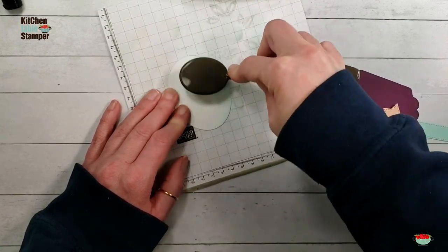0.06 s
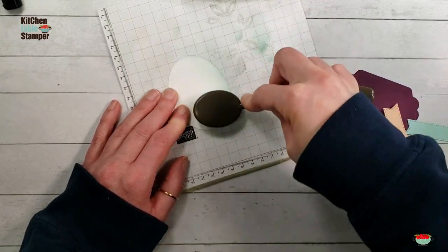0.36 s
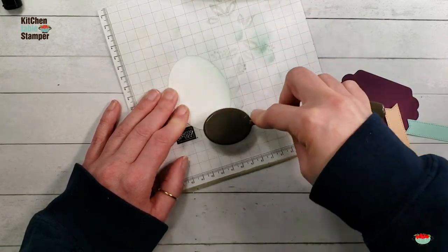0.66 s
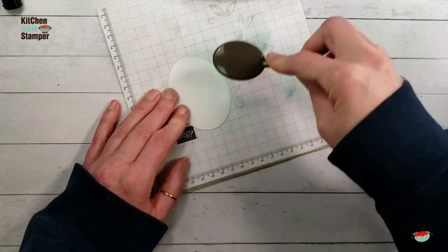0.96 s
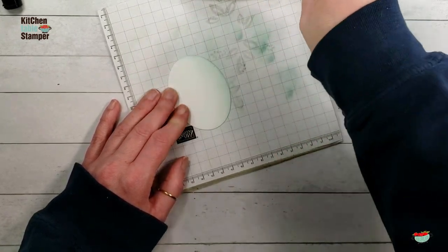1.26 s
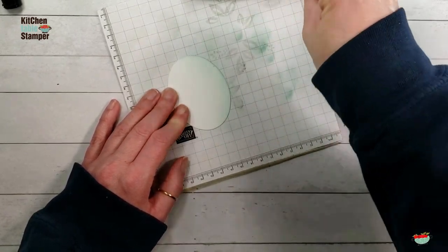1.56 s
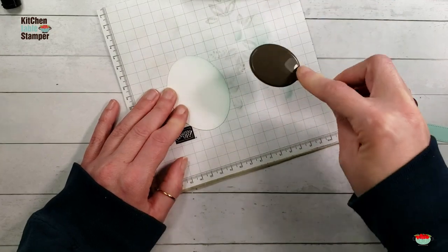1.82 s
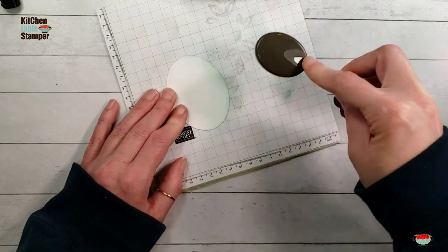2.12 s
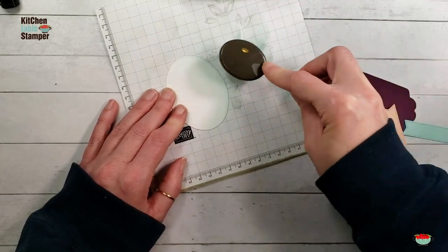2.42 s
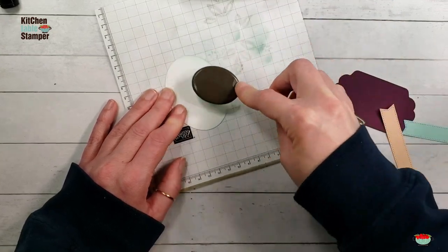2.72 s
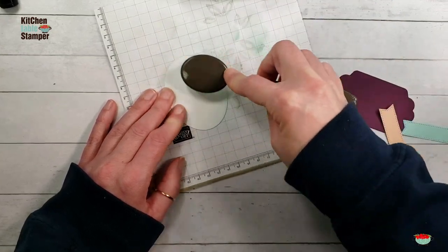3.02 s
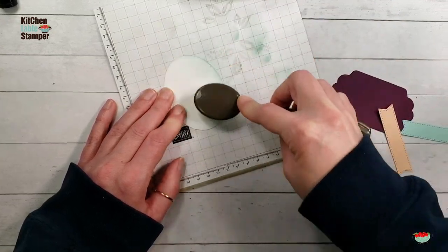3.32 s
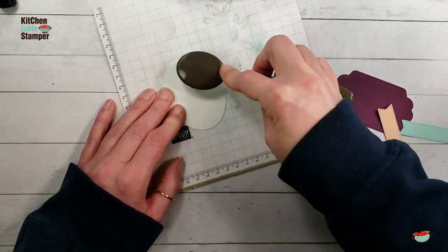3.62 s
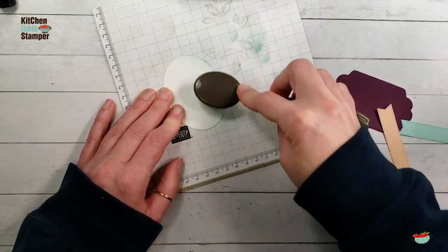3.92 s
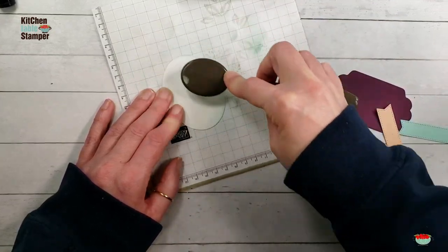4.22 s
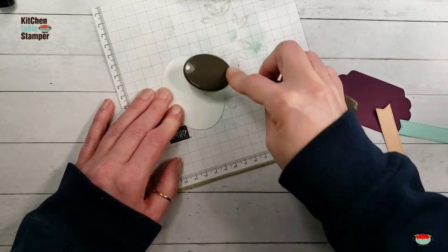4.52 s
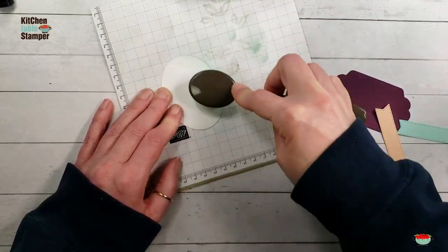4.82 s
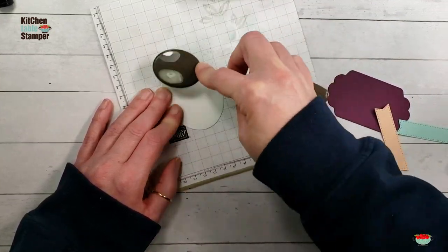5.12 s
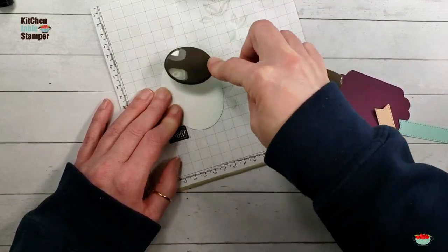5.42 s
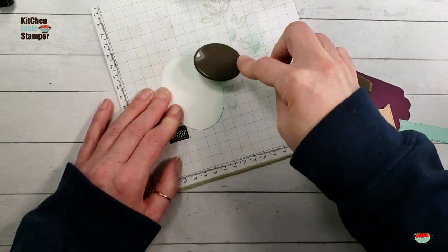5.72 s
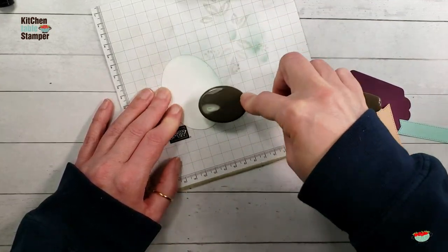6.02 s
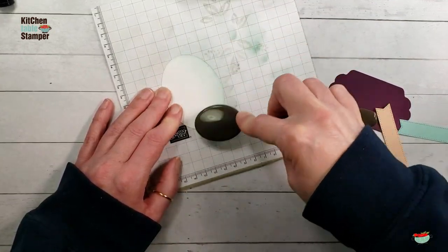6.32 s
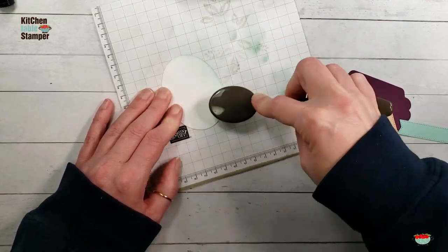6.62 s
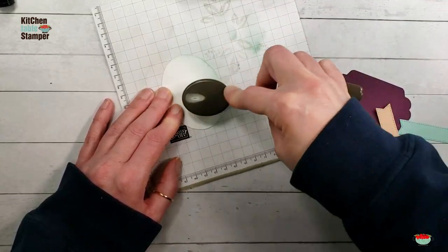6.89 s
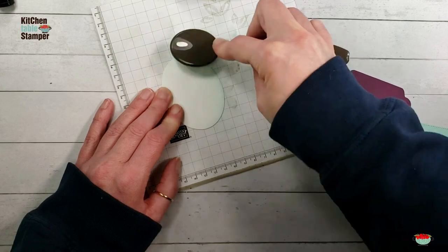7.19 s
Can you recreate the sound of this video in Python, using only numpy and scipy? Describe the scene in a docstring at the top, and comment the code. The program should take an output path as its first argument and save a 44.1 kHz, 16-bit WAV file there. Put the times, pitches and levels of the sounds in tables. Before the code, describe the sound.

A soft brush hisses back and forth over card, quickening into scrubbing, with three early knocks on a table and a low room hum.

```python
"""A soft brush hisses to and fro over card on a table, in strokes that grow shorter and quicker.
Its bristles slip on the paper, and the sheet murmurs under the slow, heavy strokes. Early on the brush
lifts and a sleeve rustles faintly: three knocks set the table ringing, and around the second something
ridged slides with a fine zip. Then the brush head lands with soft thumps as the sweeps return and
tighten into scrubbing. Underneath, a small room rumbles and an appliance hums."""
import sys
import numpy as np
from scipy import signal
from scipy.fft import rfft, irfft, next_fast_len
from scipy.io import wavfile
from scipy.ndimage import uniform_filter1d

SR = 44100
rng = np.random.default_rng(int(sys.argv[2]) if len(sys.argv) > 2 else 0)


def wav_record(signal):
    """Record a signal, one row per channel, as 16-bit PCM in the file named by sys.argv[1]."""
    frames = np.transpose(np.atleast_2d(signal))
    bounded = np.clip(frames, -1, 1)
    # unit amplitude maps onto the largest positive 16-bit level
    quanta = np.round(bounded * 32767).astype(np.int16)
    wavfile.write(sys.argv[1], SR, quanta)


N = 324267
T = np.arange(N) / SR


def from_db(db):
    """Decibels to gain."""
    return 10 ** (np.asarray(db) / 20)


def rms_one(x):
    """Scale to unit rms."""
    return x / np.sqrt(np.mean(x ** 2) + 1e-20)


def automation(points):
    """Draw a (time, value) curve through every sample."""
    return np.interp(T, *np.transpose(points))


def at_hz(points, hz):
    """Read a table on a log-frequency axis."""
    f, value = np.transpose(points)
    return np.interp(np.log(hz + 1e-3), np.log(f), value)


def equalise(x, spectrum):
    """Shape x with an EQ curve that rolls off below its first point."""
    size = next_fast_len(len(x))
    hz = np.arange(size // 2 + 1) * SR / size
    low_cut = 1 - np.exp(-(hz / spectrum[0][0]) ** 2 * 2)
    return irfft(rfft(x, size) * from_db(at_hz(spectrum, hz)) * low_cut, size)[:len(x)]


def band(x, low_hz, high_hz, order=2):
    """Butterworth band-pass."""
    return signal.sosfilt(signal.butter(order, [low_hz, high_hz], "band", fs=SR, output="sos"), x)


def resonant_noise(hz, width):
    """One steady band of noise at unit rms, its lower edge no lower than 10 Hz."""
    noise = rng.standard_normal(N + SR)
    return rms_one(band(noise, max(hz - width / 2, 10), hz + width / 2)[SR:])


def ring(force, hz, t60):
    """One mode: a unit click starts a decaying sine of height 1."""
    r, w = from_db(-60 / (t60 * SR)), 2 * np.pi * hz / SR
    return signal.lfilter([0, np.sin(w)], [1, -2 * r * np.cos(w), r * r], force + 1e-18)


def add(out, s, sound):
    """Mix a sound in at time s."""
    i = int(s * SR)
    out[i:i + len(sound)] += sound[:N - i]


def friction(spread_db):
    """Countless tiny slips of uneven size."""
    return rng.standard_normal(N) * from_db(spread_db * rng.standard_normal(N))


# EQ of the room air: (frequency [Hz], gain [dB])
AIR_EQ = [(12, 6), (30, 0.5), (45, -19), (60, -7.5), (80, -16.5), (130, -18), (190, -29), (330, -29),
          (450, -33), (900, -38), (2000, -46), (4000, -53.5), (9000, -60.5), (16000, -65)]
# partials of the appliance hum: (frequency [Hz], level [dB])
HUM_PARTIALS = [(59.6, -52), (119.2, -49.5), (238.4, -67)]
def room_tone(air_mids_db=-61.5, waver=.24, fan_hz=540, fan_db=-63):
    """The bed: rumbling air, an appliance's slightly wavering hum and the soft note of its fan."""
    air = equalise(rng.standard_normal(N), AIR_EQ)
    air = air / np.std(band(air, 700, 3000, order=4))
    hum = 0
    for hz, db in HUM_PARTIALS:
        tone = np.sqrt(2) * np.sin(2 * np.pi * hz * T)
        hum = hum + from_db(db) * (tone + waver * resonant_noise(hz, width=11.3))
    fan = resonant_noise(fan_hz, width=28)
    return from_db(air_mids_db) * air + hum + from_db(fan_db) * fan


# tone of the reverb: (frequency [Hz], gain [dB])
REVERB_EQ = [(60, 0.5), (150, -0.5), (300, 0.5), (700, -4), (2000, 4.5), (5000, 1), (10000, -3),
             (16000, 5.5)]
# decay of the reverb: (frequency [Hz], t60 [s])
REVERB_DECAY = [(100, 0.28), (400, 0.43), (1000, 0.55), (3000, 0.33), (8000, 0.27), (16000, 0.33)]
def room_reverb(x, wet_db=-9, predelay_s=.0062):
    """The small room's diffuse tail dies away band by band."""
    t, edges = np.arange(SR * 3 // 4) / SR, np.geomspace(50, 18000, 13)
    tail = 0
    for low, high in zip(edges, edges[1:]):
        hz = np.sqrt(low * high)
        decay = from_db(at_hz(REVERB_EQ, hz) - 60 * t / at_hz(REVERB_DECAY, hz))
        tail = tail + band(rng.standard_normal(len(t)), low, high) * decay
    tail = tail * (t > predelay_s)
    return from_db(wet_db) * signal.fftconvolve(x, tail / np.sqrt(np.sum(tail ** 2)))[:N]


def wall_echo(x, echo_db=-19, echo_s=.043, dull_hz=700):
    """One dull slap back from the far wall."""
    return from_db(echo_db) * band(np.interp(T - echo_s, T, x), 160, dull_hz, order=1)


# EQ of the slide's rasp: (frequency [Hz], gain [dB])
RASP_EQ = [(400, -16), (1000, 14), (2300, 2), (3500, 4), (4900, 8), (6000, 0.5), (8000, 0), (10000, -12),
           (16000, -14)]
def slide(start_s=1.194, end_s=1.596, peak_db=-50, zip_db=-17, top_ridges_hz=9700):
    """A finely ridged surface rasps with a thin zip; pitch and level follow one arch of speed."""
    arch = np.abs(np.sin(np.pi * np.clip((T - start_s) / (end_s - start_s), 0, 1)))
    jitter = 1 + .022 * resonant_noise(300, width=560)
    ridges_hz = top_ridges_hz * arch ** .4 * jitter
    whistle = np.sin(2 * np.pi * np.cumsum(ridges_hz) / SR)
    rasp = rms_one(equalise(friction(spread_db=3), RASP_EQ))
    return from_db(peak_db) * arch ** 1.4 * (rasp + from_db(zip_db) * whistle)


# modes of the table top: (frequency [Hz], level [dB], t60 [s])
TABLE_MODES = [(118, 5.5, .105), (160, -14, .1), (225, -11, .1), (252, -9.5, .11), (305, -12.5, .1),
               (375, -12, .07), (430, -9, .1), (490, -13, .08), (545, -6, .065), (679, -6.5, .06),
               (800, -13, .045), (1000, -16, .05), (1205, -22, .05), (1500, -25, .04)]
def table_top(t, hollow_db, hollow_hz=265, width_octaves=.71):
    """The table rings from one blow; a hollow-sounding blow favours the low mids."""
    click, out = 1.0 * (t == 0), 0
    for hz, db, t60 in TABLE_MODES:
        nearness = np.exp(-(np.log2(hz / hollow_hz) / width_octaves) ** 2)
        out = out - from_db(db + hollow_db * (nearness - .5)) * ring(click, hz, t60)
    return out


# EQ of a hard contact's crack: (frequency [Hz], gain [dB])
CRACK_EQ = [(400, 1), (900, 0.5), (1400, -2.5), (1900, -5.5), (2400, -9.5), (3100, -15.5), (3800, -14),
            (6500, -22), (10000, -33), (16000, -41)]
# knocks on the table; crack and snap are relative to strength: (time [s], strength [dB],
# hollowness [dB], push [0-1], crack [dB], crack centre [Hz], snap [dB])
KNOCK_CUES = [(1.1798, -11.3, 1, .45, -4.5, 2800, -20), (1.3586, -9.2, -2, .54, -2, 3000, -20),
              (1.9792, -9.7, 16, .25, -1, 1400, -15)]
def knocks(push_s=.00495, body_hz=1400, crack_trim_db=-5, rise_s=.0004, crack_t60=.032, snap_t60=.015):
    """A short push, then the hard contact that snaps, cracks and sets the table ringing."""
    body, attacks, t = np.zeros(N), np.zeros(N), np.arange(SR // 2) / SR
    crack_envelope = (1 - np.exp(-t / rise_s)) * from_db(-60 * t / crack_t60)
    for s, db, hollow_db, push, crack_db, centre_hz, snap_db in KNOCK_CUES:
        add(body, s - push_s, push * np.linspace(0, 1, int(push_s * SR)) ** 2)
        add(body, s, from_db(db) * table_top(t, hollow_db))
        crack = equalise(rng.standard_normal(len(t)), CRACK_EQ)
        crack = rms_one(crack + band(crack, centre_hz / 1.32, centre_hz * 1.08, order=1))
        add(attacks, s - rise_s, from_db(db + crack_db + crack_trim_db) * crack_envelope * crack)
        snap = from_db(db + snap_db - 60 * t / snap_t60) * rng.standard_normal(len(t))
        add(attacks, s, band(snap, 2600, 8500))
    # the heavy top cannot follow the fastest part of the blow
    return attacks + signal.sosfilt(signal.butter(2, body_hz, fs=SR, output="sos"), body)


# the brush head touches down: (time [s], strength [dB], tick relative to strength [dB])
LANDING_CUES = [(2.49, -42.5, -26), (3.859, -34, -13), (4.948, -29.5, -14), (5.54, -30.5, -22),
                (5.745, -37.5, -30), (6.113, -37.5, -30), (6.282, -34.5, -30), (6.469, -39.5, -28),
                (6.753, -40, -32)]
def landings(soft_hz=440, tick_t60=.04):
    """The padded head gives a dull thump, a little different each time, and a faint tick of bristles."""
    thumps, ticks, t = np.zeros(N), np.zeros(N), np.arange(SR // 3) / SR
    for s, db, tick_db in LANDING_CUES:
        add(thumps, s, from_db(db) * table_top(t, hollow_db=rng.normal(5, 4.3)))
        add(ticks, s, from_db(db + tick_db - 60 * t / tick_t60) * rng.standard_normal(len(t)))
    return band(thumps, 80, soft_hz) + band(ticks, 1200, 5500)


# resonances of the card: (frequency [Hz], width [Hz], relative level [dB])
SHEET_RESONANCES = [(285, 139, 3), (610, 450, -12.5), (899, 184, -1), (1600, 850, -12.5)]
# fader of its murmur: (time [s], level [dB])
SHEET_FADER = [(0, -57), (.8, -63), (2.5, -61.5), (2.9, -56), (3.3, -56), (4.5, -67), (5.5, -61.5),
               (7.35, -86)]
def sheet_murmur(motion):
    """The card resonates under the moving brush, most in the slow, heavy strokes."""
    murmur = sum(from_db(db) * np.sqrt(width) * resonant_noise(hz, width)
                 for hz, width, db in SHEET_RESONANCES)
    return from_db(automation(SHEET_FADER)) * motion * rms_one(murmur)


# scrubbing cycles: (start [s], pace of the return as treble lift [dB])
SCRUB_CYCLES = [(5.30, .5), (5.525, 1), (5.73, 2), (5.92, 1.2), (6.10, -.5), (6.273, 3.2), (6.455, 2.3),
                (6.642, 2.5), (6.826, 3), (6.998, 1.7), (7.172, 3)]
# round loops flatten into straight strokes: (time [s], pause before push [s], pause before return [s])
TURN_PAUSES = [(5.3, .018, 0.0046), (5.6, .028, 0), (6.05, .028, .002), (6.5, 0.03, .03), (6.8, .016, .02),
               (7.3, 0.007, .018)]
def scrub_strokes(end_s=7.36, push_share=.52, push_pace_db=-1.6):
    """Each cycle of the hand is a push and a faster return; gives (start, end, pace) for each stroke."""
    s, before_push, before_return = np.transpose(TURN_PAUSES)
    ends = [start for start, _ in SCRUB_CYCLES[1:]] + [end_s]
    strokes = []
    for (start, return_pace_db), end in zip(SCRUB_CYCLES, ends):
        turn = start + push_share * (end - start)
        start_gap, end_gap = np.interp([start, end], s, before_push) / 2
        turn_gap = np.interp(turn, s, before_return) / 2
        strokes.append((start + start_gap, turn - turn_gap, push_pace_db))
        strokes.append((turn + turn_gap, end - end_gap, return_pace_db))
    return strokes


def stroke_envelopes(strokes, fade_s, arch_db, pace_arch_db, slowing_db):
    """Gains of the hiss and its treble: a stroke fades in, is fastest near its middle and fades out."""
    gains = np.zeros((2, N))
    for start, end, pace_db in strokes:
        fade = np.clip(np.minimum(T - start, end - T) / fade_s + .5, 0, 1)
        on = fade > 0
        from_middle = (T[on] - start) / (end - start) - .5
        arch = np.cos(np.pi * from_middle) - 2 / np.pi
        motion = fade[on] * from_db(arch_db * arch)
        treble = motion * from_db(pace_db + pace_arch_db * arch - slowing_db * from_middle)
        gains[:, on] += [motion, treble]
    return gains


# sweeps of the brush, and a faint, dull sleeve rustle near 0.9 s:
# (start [s], end [s], pace as treble lift [dB])
SWISH_CUES = [(0.01, 0.213, -3.5), (0.26, 0.47, -4), (0.52, 0.724, -3), (0.754, 0.89, -3),
              (0.89, 1.03, -13), (2.488, 2.947, -2.5), (2.975, 3.232, -.5), (3.276, 3.521, 1),
              (3.583, 3.81, 1), (3.86, 4.09, 3), (4.153, 4.375, 2.5), (4.429, 4.655, 3.5),
              (4.713, 4.905, 2), (4.95, 5.156, 2.5), (5.184, 5.286, 1)]
# hiss left at the turns: (time [s], level relative to a stroke [dB])
TURN_HISS = [(.5, -11), (3.2, -7), (3.85, -13), (4.9, -12), (5.2, -6), (5.5, -18)]
def hand_gesture():
    """Sweeps, a sleeve rustle, then scrubs: the gains of hiss and treble, and the position (0-1)."""
    scrubs = scrub_strokes()
    swishing = stroke_envelopes(SWISH_CUES, fade_s=.018, arch_db=-.2, pace_arch_db=1.5, slowing_db=.8)
    scrubbing = stroke_envelopes(scrubs, fade_s=.015, arch_db=-1, pace_arch_db=4, slowing_db=-.5)
    motion, treble = swishing + scrubbing
    # bent bristles stay on the paper through the turns
    touching = np.clip(2 * uniform_filter1d(motion, SR // 6), 0, 1)
    lingering = from_db(automation(TURN_HISS)) * touching
    position = automation([(stroke[0], k % 2) for k, stroke in enumerate(SWISH_CUES + scrubs)])
    return np.hypot(motion, lingering), np.hypot(treble, lingering), position


def near_reflection(x, position, share=.25):
    """A nearby surface adds a light flange: its delay shifts as the head travels."""
    delay_s = .0017 + .0001 * position
    return (x + share * np.interp(T - delay_s, T, x)) / np.sqrt(1 + share ** 2)


# EQ of bristles on paper: (frequency [Hz], gain [dB])
BRISTLE_EQ = [(1400, -16), (2200, -4), (3100, -6), (4000, 1), (4900, 3.5), (6600, 0), (8200, 2.5),
              (11000, 1), (14000, -1), (16000, -3)]
# pressure on the brush as the fader of its hiss, dipped for the sleeve rustle: (time [s], level [dB])
PRESSURE_FADER = [(0, -55.5), (.82, -57), (.93, -64), (2.6, -60), (2.7, -57.5), (3.4, -57.5), (4.3, -58.5),
                  (5.85, -57.5), (6.2, -60.5), (6.8, -57.5), (7.35, -58.5)]
def brush(flutter_db=.55, flicker_db=.5):
    """Slipping bristles hiss over the murmuring card, louder with pressure and brighter with pace."""
    motion, treble, position = hand_gesture()
    hiss = rms_one(equalise(friction(spread_db=1.5), BRISTLE_EQ))
    highs = equalise(hiss, [(10, -40), (5500, -25), (8000, -3), (11500, .5)])
    flicker = from_db(flicker_db * resonant_noise(14, width=8))
    hiss = motion * (hiss - highs) + treble * highs * flicker
    hiss = near_reflection(hiss, position)
    flutter = from_db(flutter_db * resonant_noise(25, width=72))
    return from_db(automation(PRESSURE_FADER)) * hiss * flutter + sheet_murmur(motion)


def scene(rubbing_send_db=-8):
    """The mono mix: blows and rubbing sound in the room, over its hum."""
    blows = knocks() + landings()
    rubbing = brush() + slide()
    ambience = room_reverb(blows + from_db(rubbing_send_db) * rubbing) + wall_echo(blows)
    return (blows + rubbing + ambience + room_tone())[None]


def record(dry, ceiling=.98, cutoff_hz=15900):
    """A soft clip rounds the highest peaks and a steep low-pass cuts the top."""
    rounded = dry / (1 + (dry / ceiling) ** 8) ** (1 / 8)
    return signal.sosfilt(signal.ellip(12, .1, 80, cutoff_hz, fs=SR, output="sos"), rounded)


dry = scene()
out = record(dry)
wav_record(out)
```